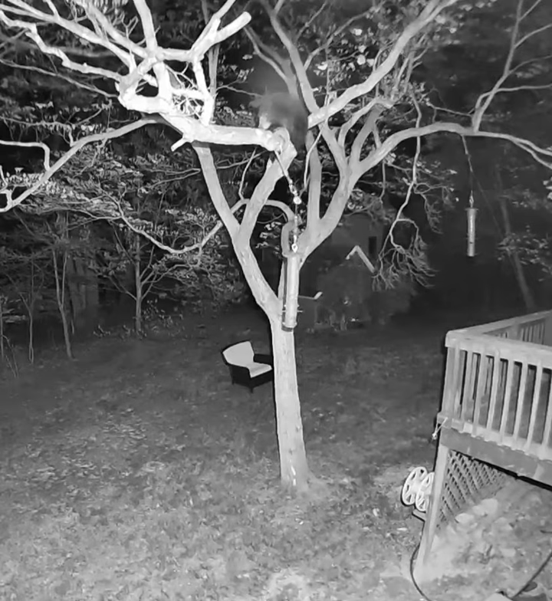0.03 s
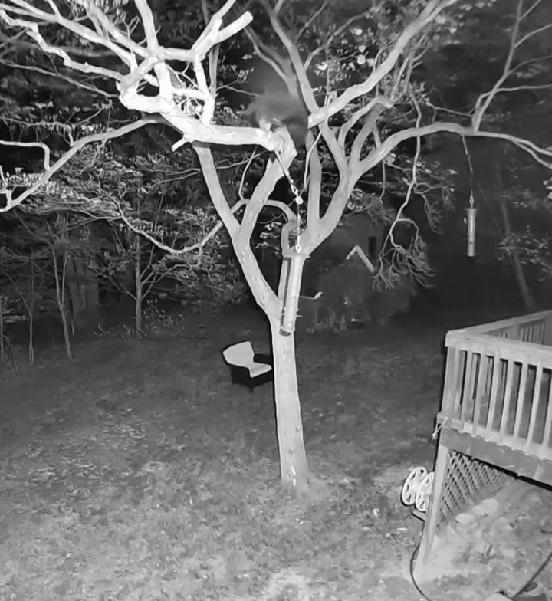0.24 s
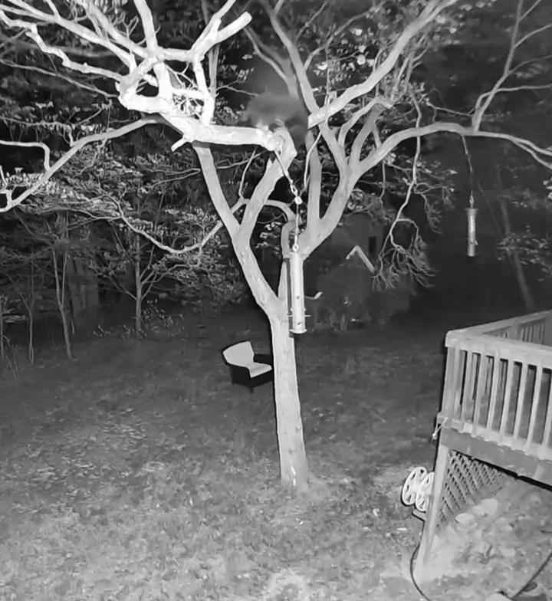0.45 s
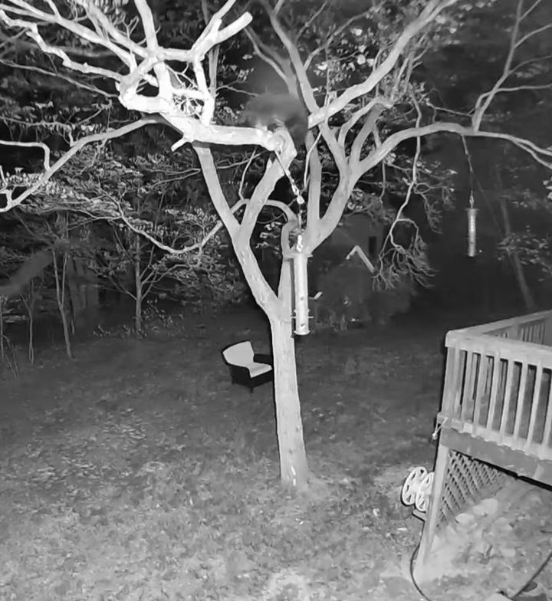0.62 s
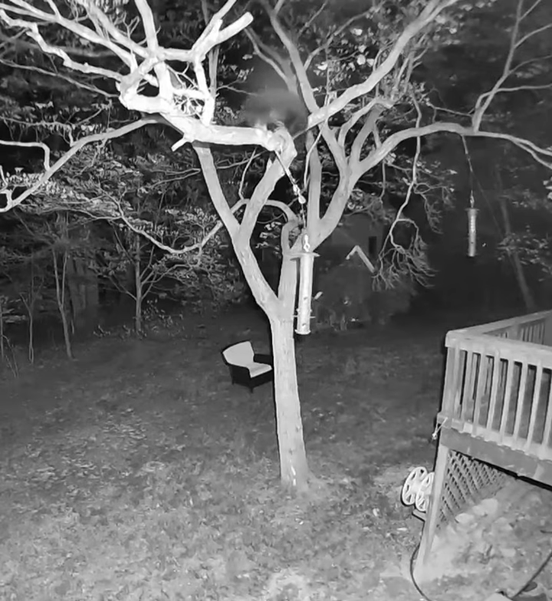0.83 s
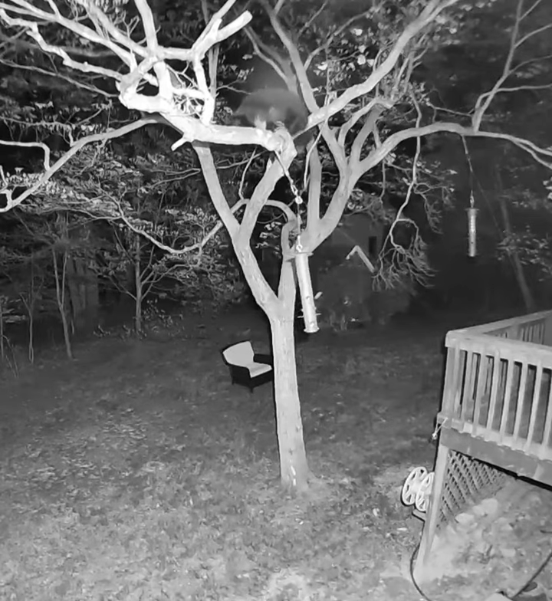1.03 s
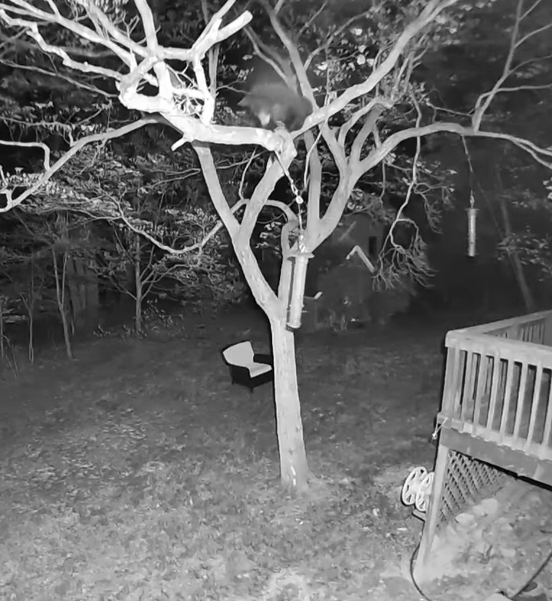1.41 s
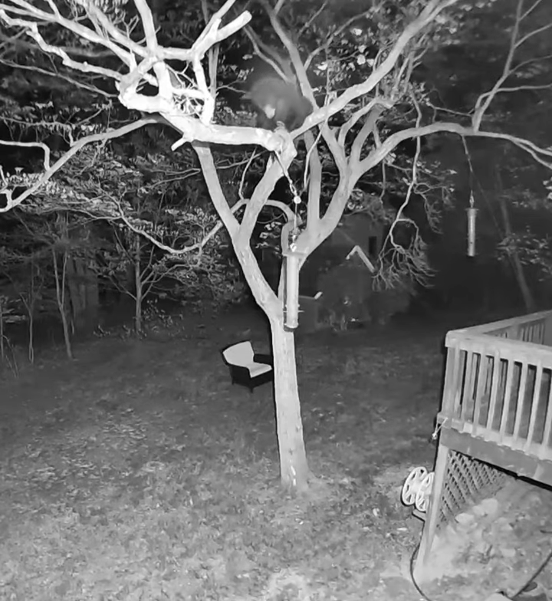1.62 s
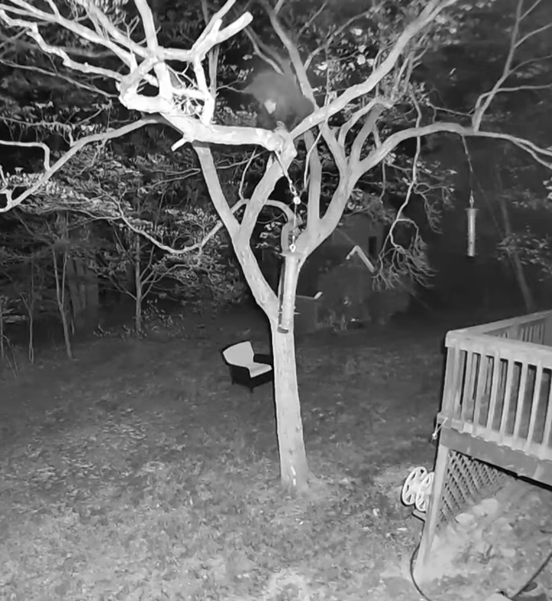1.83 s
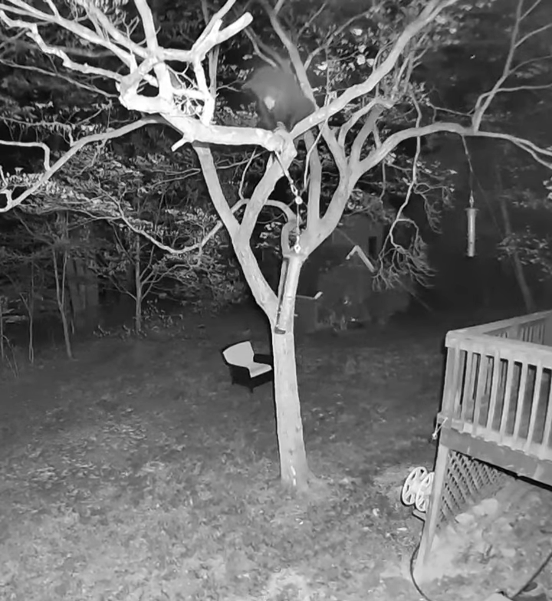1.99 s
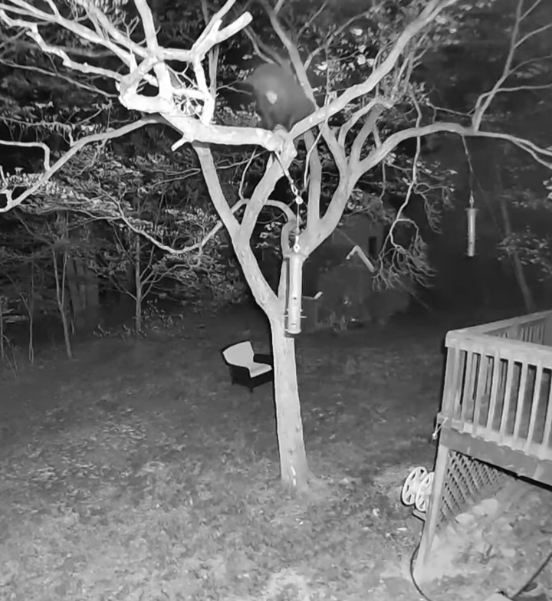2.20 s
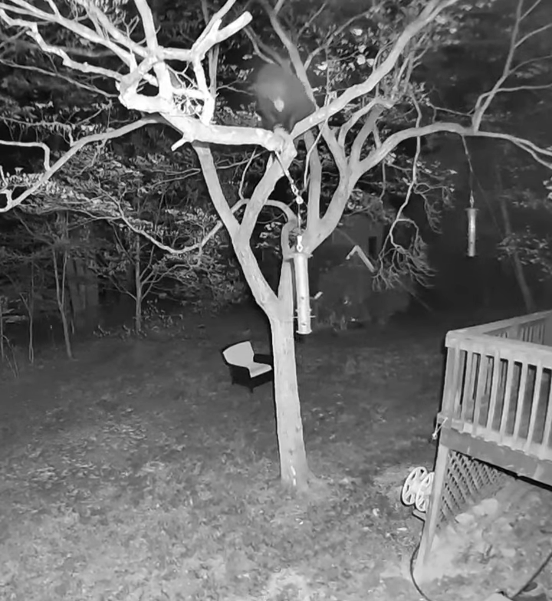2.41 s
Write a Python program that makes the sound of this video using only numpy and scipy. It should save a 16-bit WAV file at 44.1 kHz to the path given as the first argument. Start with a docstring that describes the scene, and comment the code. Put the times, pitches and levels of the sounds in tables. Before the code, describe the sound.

A small animal in a backyard tree gives short, raspy huffs, about three a second, each a sharp puff of hissing air with a slight nose whistle. The loudest come at about 0.2, 0.5 and 1.0 seconds, with a soft one at 0.8. Weaker huffs follow near 1.4, 1.6 and 1.9, and a faint last one at 2.2. Very faint rustles and still night air lie far behind.

```python
"""Short, raspy huffs, about three a second, from a small animal up a backyard tree at night.
Each opens with a tick and a low puff, then a ringing jet of air leaves the mouth and whistles
in the nose, over a faint chest thump. A soft hiss swells around each huff, and the quiet yard
answers with a short tail. Faint rustles in the tree and still night air sit far behind."""
import sys
import numpy as np
from scipy import signal
from scipy.fft import rfft, irfft
from scipy.io import wavfile
from scipy.ndimage import uniform_filter1d

SR = 44100
rng = np.random.default_rng(int(sys.argv[2]) if len(sys.argv) > 2 else 0)


def master_out(mix):
    """Clip the mix to full scale and print it as 16-bit PCM to the path in sys.argv[1]."""
    frames = np.transpose(np.atleast_2d(mix))
    ceiling = np.clip(frames, -1, 1)
    pcm = np.round(ceiling * 32767).astype(np.int16)
    wavfile.write(sys.argv[1], SR, pcm)


N = 112454
TIME_S, FREQ_HZ = np.arange(N) / SR, np.fft.rfftfreq(N, 1 / SR)
TOP_HZ = 7000

# One row per huff; level_db rides the whole huff, the other levels balance its layers:
# start_s, hold_s, level_db, puff_lead_s, puff_db, low_body_db, mouth_hz, mouth_db,
# nose_db, bright_db, treble_edge_hz, chest_db, swell_lead_s
HUFFS = [(-.030, 0.062, -43, .002, -6, 9, 2794, -5.5, -13.5, -6.5, 6900, -21.5, 0.055),
         (0.2009, 0.055, -23, 0.0006, -4, 1.5, 2255, -9, -9, -7.5, 6610, -47, 0.07),
         (0.4685, 0.037, -26.5, 0.0035, -2, -1.5, 1940, -12, -12.5, -5.5, 7400, -37.5, 0.077),
         (0.7588, 0.03, -38.5, 0.00074, -3, 3.5, 1200, -7, -5.5, -14, 6600, -29.5, 0.057),
         (1.0311, 0.031, -23.5, 0.00039, -9, -2, 2280, -9.5, -11.5, -6, 6540, -35, 0.068),
         (1.357, 0.042, -38, .001, -7.5, -1, 2385, -6, -5.5, -40.5, 6240, -30, 0.07),
         (1.621, 0.03, -33.5, 0.006, -7, 0.5, 2300, -2.5, -13, -9.5, 6600, -31, 0.082),
         (1.9154, 0.04, -36.5, .0005, -3.5, -0.5, 2300, -6.5, -9.5, -26.5, 6310, -32, 0.061),
         (2.237, 0.029, -43.5, 0.014, -5, 1.5, 2846, -4.5, -10.5, -6, 6330, -27.5, 0.061)]
def huffs():
    """The animal's huffs, each layered from jet, whistle, puff, tick and thump, with a soft hiss swelling
    around each."""
    colour = jet_colour()
    low_share = below(1320, order=12)
    low_body = causal(colour * low_share)
    puff_ring = causal(unit(resonances([(1030, 620, 0)]) * np.sqrt(colour)))
    thump, tick_noise = chest_noise(), noise(spectrum(JET) * low_cut())
    rasp = unit(undb(2.3 * flutter(400)))  # fast grain in the airflow
    out = np.zeros(N)
    for (start_s, hold_s, level_db, puff_lead_s, puff_db, low_body_db, mouth_hz, mouth_db,
         nose_db, bright_db, treble_edge_hz, chest_db, swell_lead_s) in HUFFS:
        age = TIME_S - start_s
        treble_shape = nose_hollow(nose_db) * below(treble_edge_hz, order=24)
        low = low_body * undb(low_body_db)
        high = colour * (1 - low_share) * treble_shape
        mouth = undb(mouth_db) * unit(resonances([(mouth_hz, 260, 0)]) * colour)
        nasal = nose_colour(nose_db, bright_db) * treble_shape
        huff = air_jet(age, hold_s, rasp, low, causal(high + colour * low_share / 20))
        huff += mouth_jet(age, hold_s, rasp, mouth)
        huff += nose_whistle(age, hold_s, rasp, nasal)
        huff += undb(puff_db) * puff(age, puff_lead_s, puff_ring)
        huff += tick(age, puff_lead_s, tick_noise)
        huff += hiss_swell(age, swell_lead_s, low, high, mouth, nasal)
        huff += undb(chest_db) * thump * envelope(age, 0.023, hold_s, 0.06)
        out += undb(level_db) * huff
    return out


# Narrow, fixed ringing peaks that colour every huff: pitch_hz, width_hz, level_db
RING_PEAKS = [(578.5, 39, 0.5), (827, 300, -6.5), (946, 64, -1.5), (1236, 300, 0), (1590, 60, -8),
              (1813, 270, -0.5), (2104, 170, -4), (2300, 120, 3), (2574, 130, -0.5), (2859, 77, 1),
              (3347, 280, -4.5), (3650, 76, -0.5), (3900, 70, -4), (4260, 100, -7.5)]
# Broad hiss of the air jet: frequency_hz, level_db
JET = [(100, -43), (300, -28.5), (470, -15.5), (700, -6), (1200, -7), (2400, -11.5), (3600, -5.5),
       (4600, -4.5), (5600, -13.5), (7000, -13)]
def jet_colour():
    """The tone all huffs share: narrow, fixed ringing peaks standing on a broad hiss."""
    return np.hypot(unit(resonances(RING_PEAKS)), undb(-7) * unit(spectrum(JET)))


def air_jet(age, hold_s, rasp, low, high, high_sag_db_per_s=6, low_sag_db_per_s=123):
    """A rasping jet of air; its low body sags quickly while the top holds."""
    flow = rasp * envelope(age, 0.0016, hold_s, 0.009)
    held_s = np.clip(age, 0, hold_s)
    top = blow(flow * undb(-high_sag_db_per_s * held_s), high)
    body = blow(flow * undb(-low_sag_db_per_s * held_s), low)
    return top + body


def mouth_jet(age, hold_s, rasp, mouth, attack_s=0.016):
    """The mouth opens after the puff, so its resonance fades in late."""
    return blow(rasp * envelope(age, attack_s, hold_s, 0.009), causal(mouth))


# Nose resonances: pitch_hz, width_hz, level_db
NOSE = [(5020, 120, -9), (5335, 130, 0), (5660, 80, -1), (6003, 60, -7)]
# Bright hiss around the whistle: frequency_hz, level_db
BRIGHT = [(300, -44), (1500, -26), (3000, 2), (3600, -12.5), (4600, 9), (5600, -4), (6300, 5), (7000, -2)]
def nose_colour(nose_db, bright_db):
    """The tone of the nose: narrow whistle peaks blended with bright hiss."""
    return np.hypot(undb(nose_db) * unit(resonances(NOSE)), undb(bright_db) * unit(spectrum(BRIGHT)))


def nose_hollow(nose_db, centre_hz=4520, width_hz=200, fully_open_db=-21.5):
    """The more air takes the nose, the deeper the notch just under its whistle."""
    return undb(fully_open_db * undb(nose_db) * np.exp(-((FREQ_HZ - centre_hz) / width_hz) ** 2))


def nose_whistle(age, hold_s, rasp, nasal):
    """Air whistles through the nose and starts to fade before the main jet does."""
    return blow(rasp * envelope(age, 0.007, 0.62 * hold_s, 0.012), causal(nasal))


def puff(age, lead_s, ring, end_s=0.0059):
    """A low pop of air that opens the huff just ahead of the jet."""
    return blow(arch(age, lead_s, end_s), ring)


def tick(age, puff_lead_s, tick_noise):
    """The front-edge transient: the shorter the puff's lead, the harder the tick."""
    strength = undb(-1) * np.exp(-puff_lead_s / 0.006)
    return strength * tick_noise * envelope(age, 0.0008, 0.0016, 0.0008)


def hiss_swell(age, lead_s, low, high, mouth, nasal):
    """A soft hiss rises and falls around each huff, in a blurred version of its colour."""
    swell = undb(-17.5) * arch(age, lead_s, end_s=0.12) ** 0.94
    colour = np.sqrt(abs(low) ** 2 / 2 + high ** 2 + mouth ** 2 / 2 + (undb(4.5) * nasal) ** 2)
    return blow(swell, uniform_filter1d(colour, size=1300))


def blow(contour, colour):
    """Noise that follows a level contour, filtered to a colour."""
    return irfft(rfft(contour * rng.standard_normal(N)) * colour * low_cut(), N)


def low_cut():
    """Gain curve that thins the sound below 590 Hz."""
    return 1 - below(590, order=10)


# Weight of the chest: frequency_hz, level_db
CHEST = [(25, -11.5), (50, -7), (90, -6), (130, 1), (190, -10), (270, 0), (400, -2), (800, -29.5)]
def chest_noise():
    """Low rumble of the chest, which each huff shapes into a thump."""
    return noise(spectrum(CHEST))


# Tone of the reflections from tree and yard: frequency_hz, level_db
YARD = [(100, 8.5), (500, 1.5), (1300, -1), (2500, -6.5), (4500, -5.5), (5600, -7.5), (7000, -2)]
def echoes(x, t60_s, delay_s):
    """Scattered reflections that die away evenly."""
    decay = envelope(TIME_S - delay_s, 0.015, 0, t60_s / np.log(1000))
    tail = noise(spectrum(YARD) * (FREQ_HZ < TOP_HZ)) * decay
    return signal.fftconvolve(x, tail / np.sqrt(np.sum(tail ** 2) * SR / 2 / TOP_HZ))[:N]


# Stirs in the tree: peak_s, half_length_s, level_db
RUSTLES = [(.07, 0.052, -58.5), (.90, 0.067, -63), (1.49, 0.027, -63.5), (2.07, 0.049, -69),
           (2.5, 0.15, -65)]
def rustle():
    """Faint, flickering rustles in the tree between the huffs."""
    colour = spectrum([(200, -24.5), (800, -8), (1250, -0.5), (1800, -7),
                       (2500, -1), (3500, -8), (7000, -13)])
    stir = sum(undb(level_db) * np.exp(-((TIME_S - peak_s) / half_length_s) ** 2)
               for peak_s, half_length_s, level_db in RUSTLES)
    return stir * noise(colour) * undb(2 * flutter(30))


# Tone of the night air: frequency_hz, level_db
NIGHT = [(25, -6.5), (50, -3), (130, -1.5), (250, -1), (450, -3), (800, -0.5), (1300, -13.5), (1550, -7),
         (1800, -12.5), (2300, -16.5), (4000, -7.5), (7000, -5.5)]
def night_air(level_db):
    """A steady bed of still night air."""
    return undb(level_db) * noise(spectrum(NIGHT))


def undb(db):
    """Decibels to gain."""
    return 10 ** (np.asarray(db) / 20)


def unit(x):
    """Scale to rms 1."""
    return x / np.sqrt(np.mean(x ** 2))


def spectrum(points):
    """Gain curve through (frequency_hz, level_db) points."""
    hz, db = np.array(points, float).T
    return undb(np.interp(np.log(FREQ_HZ + 1), np.log(hz), db))


def resonances(peaks):
    """Gain curve of steep-sided (pitch_hz, width_hz, level_db) peaks."""
    return np.sqrt(sum(undb(db) ** 2 / (1 + ((FREQ_HZ - hz) / width * 2) ** 2) ** 2
                       for hz, width, db in peaks))


def below(hz, order):
    """Gain curve of a smooth low-pass."""
    return 1 / (1 + (FREQ_HZ / hz) ** order)


def causal(gain):
    """A filter with this gain that rings only after it is excited."""
    cepstrum = irfft(np.log(gain + 1e-4), N)
    fold = np.sign(N / 2 - np.arange(N)) + 1
    fold[0] = 1
    return np.exp(rfft(cepstrum * fold))


def noise(gain):
    """Noise of rms 1 with the given colour."""
    return unit(irfft(gain * (rng.standard_normal(len(gain)) + 1j * rng.standard_normal(len(gain))), N))


def flutter(hz):
    """Smooth random wobble of rms 1, moving up to about the given rate."""
    return noise(np.exp(-(FREQ_HZ / hz) ** 2))


def envelope(age, attack_s, hold_s, release_s):
    """Straight rise, hold, exponential fall."""
    return np.clip(age / attack_s, 0, 1) * np.exp(-np.maximum(age - hold_s, 0) / release_s)


def arch(age, lead_s, end_s):
    """Half-sine swell from lead_s before the onset to end_s after it."""
    return np.sin(np.pi * np.clip((age + lead_s) / (lead_s + end_s), 0, 1))


# Stereo width of the close sound, side against centre: frequency_hz, level_db
SIDE = [(100, -15), (300, -19), (600, -28), (1200, -25), (2300, -19), (3500, -25), (7000, -29)]
def scene():
    """The animal straight ahead, reflections from tree and yard, rustles and night air."""
    animal = huffs()
    near = animal + undb(-13.5) * echoes(animal, t60_s=0.066, delay_s=0.0021)

    def yard_tail():
        return undb(-25.5) * echoes(animal, t60_s=0.48, delay_s=0.0097)

    mid = near + yard_tail() + rustle() + night_air(-74)
    side = irfft(1j * rfft(near) * spectrum(SIDE), N)  # a quarter-cycle shift widens without panning
    side += 0.083 * yard_tail() + night_air(-98.5)
    return np.array([mid + side, mid - side])


def record(dry):
    """A small outdoor camera that cuts the treble steeply."""
    return signal.sosfilt(signal.ellip(12, .2, 75, TOP_HZ, fs=SR, output="sos"), dry)


dry = scene()
out = record(dry)
master_out(out)
```